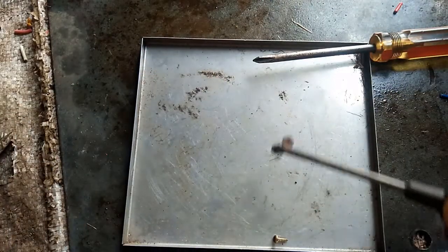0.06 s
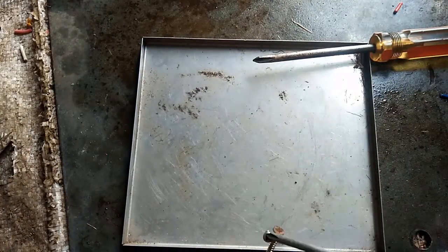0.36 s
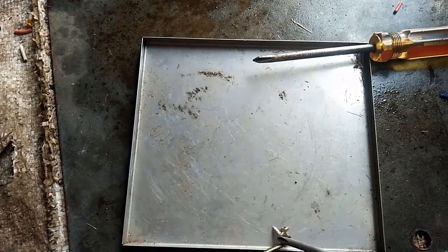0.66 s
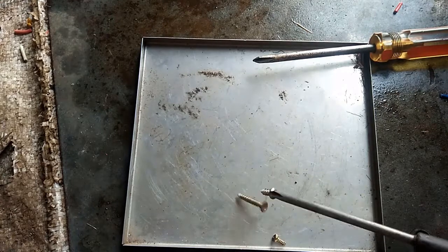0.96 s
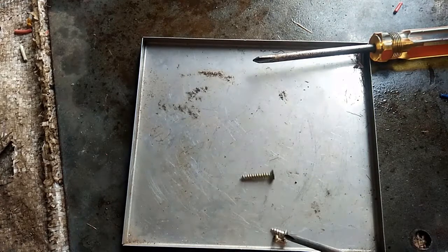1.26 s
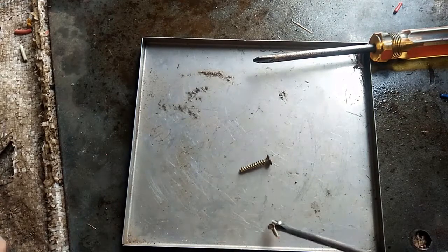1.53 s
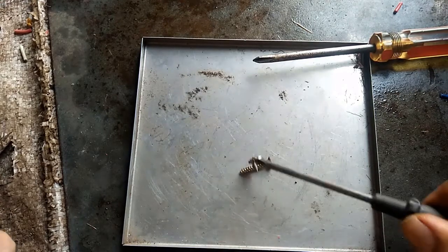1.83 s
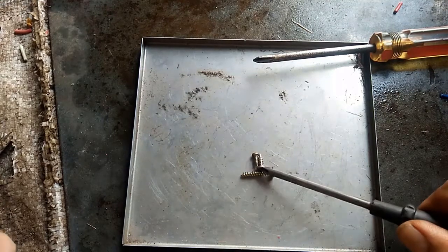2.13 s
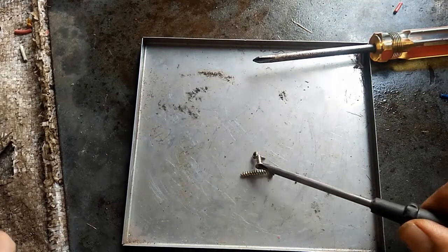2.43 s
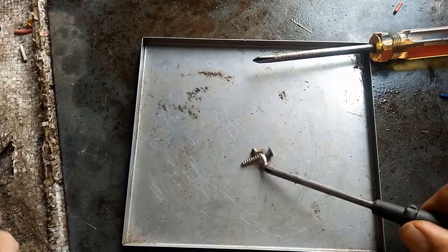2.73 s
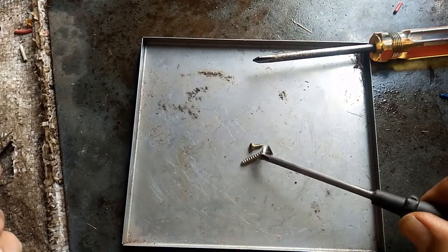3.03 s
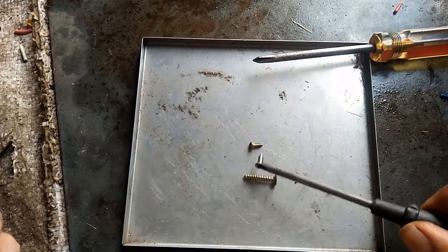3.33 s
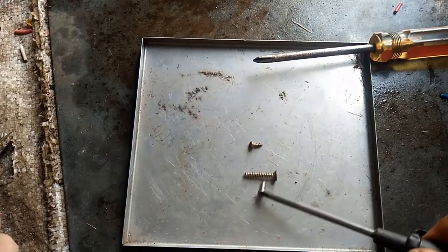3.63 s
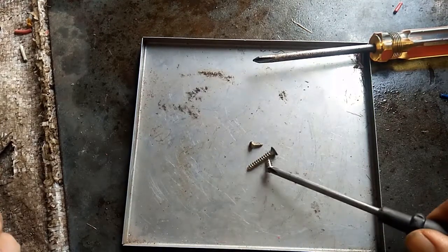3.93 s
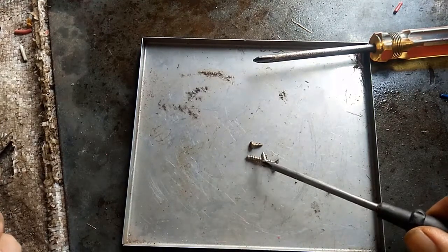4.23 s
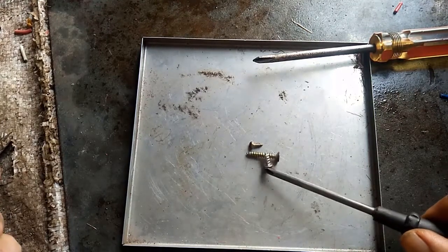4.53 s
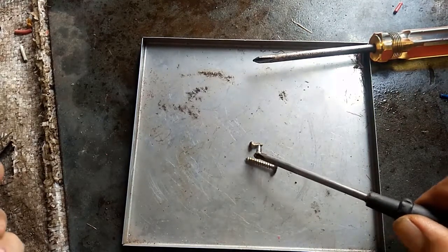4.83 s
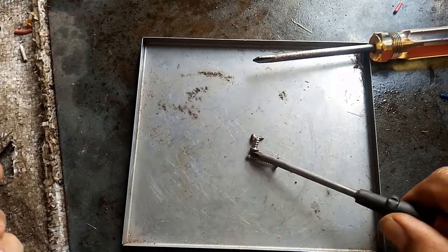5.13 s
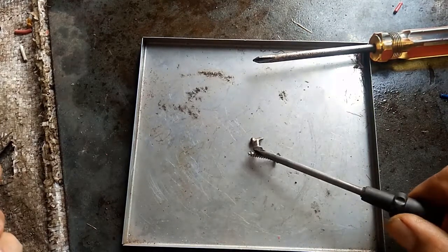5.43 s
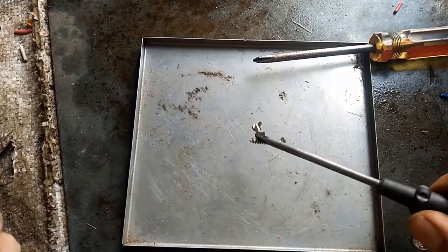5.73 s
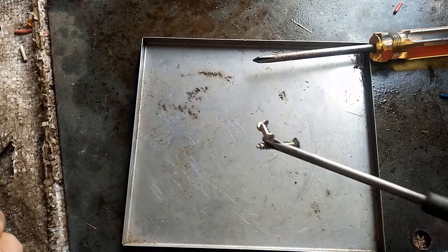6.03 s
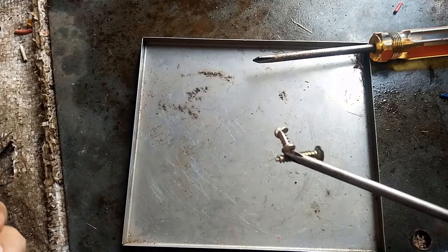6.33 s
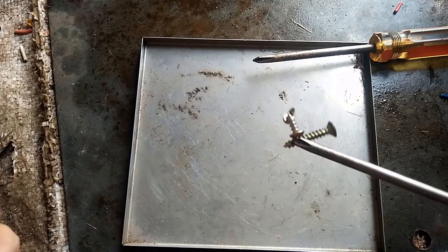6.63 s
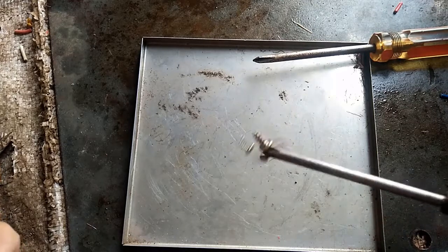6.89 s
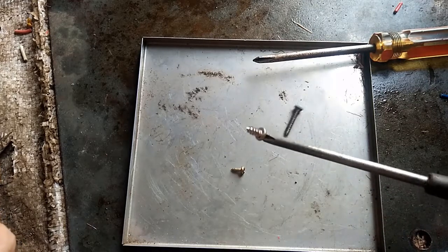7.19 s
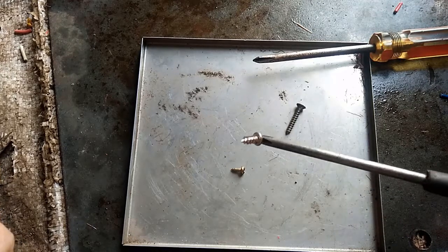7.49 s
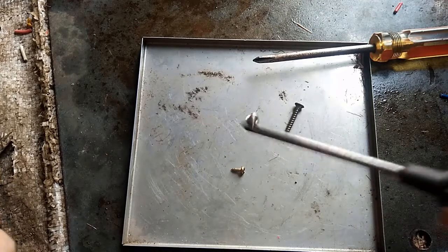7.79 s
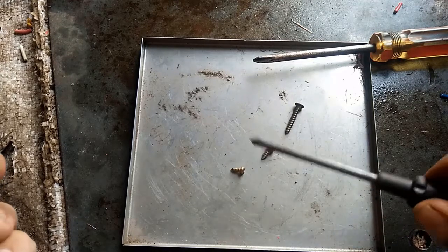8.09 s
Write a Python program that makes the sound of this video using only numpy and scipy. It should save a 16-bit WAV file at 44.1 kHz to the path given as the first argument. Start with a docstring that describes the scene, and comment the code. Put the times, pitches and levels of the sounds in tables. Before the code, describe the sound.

In a quiet room, close to a small microphone, steel screws click and chatter against each other as a magnetized screwdriver picks them up. They clatter briefly on a thin metal tray, then keep ticking in short clusters amid soft bumps of the hands and faint squeaks. After a pause, screws fall onto the tray three times, ringing and rattling, the hardest blow overloading the microphone.

```python
"""In a quiet room, close to a small microphone, a magnetised screwdriver picks up steel screws from a tray.
The screws snap onto the tip and chatter against each other. Some drop and set the sheet-metal tray
ringing, and the hardest blows overload the microphone's input. The moving hands add soft thumps and
rustle. A few thin squeaks sound over a faint hiss and hum."""
import sys
import numpy as np
from scipy import signal
from scipy.fft import rfft, irfft
from scipy.io import wavfile
from scipy.ndimage import uniform_filter1d

SR = 44100
rng = np.random.default_rng(int(sys.argv[2]) if len(sys.argv) > 2 else 0)


def inscribe(sig):
    """Save sig as 16-bit PCM at rate SR to the path in sys.argv[1].

    A 1-D sig is mono; a 2-D sig holds one channel per row.
    Samples are clipped to [-1, 1] before scaling.
    """
    pcm = np.round(np.clip(np.atleast_2d(sig).T, -1, 1) * 32767)
    wavfile.write(sys.argv[1], SR, pcm.astype(np.int16))


N = 359414

# Screws meeting the tip or each other. Each row: start in seconds, level in dB, body (below 4 kHz) in dB,
# edge (above 7 kHz) in dB, tiny bounces compared with the first tick in dB.
SCREW_CLICKS = [(0.591, -26.5, 3, -7, -1), (0.604, -12, -3, -3, 3), (0.6282, -11, -3, 1, 20),
                (0.6395, -11.5, -1, 0, 2.5), (0.6479, -6, -3, -7, -2), (0.6608, -9, -3.5, -13, 13),
                (0.6637, -8.5, -1.5, 0, 6), (0.6757, -9, -7, 0, -2), (0.6819, -12.5, -1.5, -4, 3),
                (0.7319, -12, -4, 0.5, 7), (0.8034, -31.5, 6, -0.5, 1), (0.8438, -17.5, -23, -1, 9),
                (0.8457, -29, 10.5, -3, 20), (0.8736, -32, 6.5, 0, 1), (0.9355, -28.5, -9, -6.5, -0.5),
                (1.2027, -10, 1, 2, 4), (1.407, -42, 6, 5, 5), (1.4199, -18, 1, 1.5, 9),
                (1.4453, -16, 6.5, 0.5, 24.5), (1.5593, -41.5, -3, -1, 2.5), (2.146, -24, 0.5, -7, 2.5),
                (2.152, -10, 1, -3, 3), (2.2202, -35, 6, -3, 12), (2.2364, -38.5, 1.5, -2, 8),
                (2.5115, -33, 0.5, -0.5, 8), (2.5394, -30.5, -1.5, -3.5, -3), (2.8686, -29, -10, 3, 4.5),
                (2.8766, -15.5, 8.5, 2.5, 6), (2.8834, -16, 8.5, -1.5, 26), (2.8942, -16, 11.5, 4.5, -5),
                (2.9206, -13.5, 3.5, -3.5, 6.5), (2.942, -28, 2, -1, 5.5), (3.1361, -40.5, 10, -5, -3),
                (3.1838, -42.5, 8.5, 2, 3), (3.1969, -40.5, 4, -2, 3), (3.2206, -42.5, 1, -6.5, -2),
                (3.507, -40, 6, -18, 6.5), (3.8389, -31, 5.5, -1.5, 8.5), (3.868, -22, 7, 0, 11),
                (3.884, -25.5, 7, -6, 5.5), (4.113, -47, -9, -12.5, 7), (4.2038, -43, -3, -8.5, 5.5),
                (4.2334, -37, -2, -4.5, 4), (4.3194, -9, 1.5, -1.5, 15.5), (4.6131, -19, 8, 0, 12),
                (4.6381, -30.5, -3, -8, 8), (4.7143, -42, 2.5, -9.5, -0.5), (4.826, -56, -4, -14, 4.5),
                (4.8552, -55.5, -3, -18, 5), (5.1393, -36.5, 7, 1.5, 5), (5.1589, -17.5, 3, -4, 8.5),
                (5.1937, -9.5, 1.5, 0.5, 6), (5.203, -14.5, 5.5, -1, 10), (5.482, -57, 4, 2.5, 8),
                (7.091, -34, 3, 4.5, -2.5), (7.114, -34.5, 6.5, 6.5, -1), (7.748, -50.5, -5, -16, 8),
                (7.8795, -28.5, 2, -2.5, -5.5), (7.99, -32, 0, 0.5, 2)]
# Screws hitting the tray. Each row: start in seconds, then impact, ring, body and edge, all in dB.
SCREW_DROPS = [(0.6595, -31, -31.5, 14.5, 6.5), (0.7325, -38, -38, -15.5, -1.5), (1.1591, -2, -24, 8, -2),
               (1.211, -0.5, -21, 1, 0.5), (2.8771, -20.5, -38.5, 1, -1), (4.3196, -18, -43, -1, 4.5),
               (7.157, 2, -16.5, -1, 2.5), (7.361, 9, -7, -3, 1), (8.0573, 4, -12, -1.5, 1)]
# Soft knocks of the hand. Each row: start in seconds, level in dB, pitch in Hz.
HAND_KNOCKS = [(0.237, -17.5, 82), (0.437, -16, 72), (0.625, -15.5, 57), (1.033, -24, 72.6),
               (1.105, -24, 75), (1.201, -26, 101), (1.284, -24, 82.5), (2.159, -24, 75),
               (2.268, -30.5, 103), (2.748, -23.5, 76), (2.92, -27, 107), (3.181, -23.5, 69),
               (3.308, -24.5, 65), (3.387, -17, 62.7), (3.406, -17.5, 75), (3.499, -26.5, 75),
               (3.624, -26.5, 70.8), (3.867, -20, 72), (4.298, -26.5, 70), (4.357, -26, 66),
               (5.235, -21, 104), (5.648, -30, 57.7), (7.162, -24, 110), (7.661, -24.5, 68)]
# The tone colour of the tray's many weak notes. Each row: frequency in Hz, level in dB.
SHEET_COLOUR = [(150, -13), (500, -22), (1400, -29), (2150, -17.5), (3100, -18.5), (4000, -11),
                (4400, -7.5), (5800, -0.5), (6500, -7.5), (7800, -14), (10500, -17), (13800, -28.5),
                (15500, -52)]


def screws(ring_t60=0.042, shifts=20, shift_db=-8, spread_db=2):
    """The magnet pulls the screws in. Held fast, they hardly ring, and tick faintly as the hand moves."""
    out, movement = np.zeros(N), hand_movement()
    for start, db, body_db, edge_db, scatter_db in SCREW_CLICKS:
        add(out, start, gain_of(db) * steel_tick(body_db, edge_db, scatter_db, ring_t60))
    for sample, strength in zip(rng.integers(0, N, shifts), rng.standard_normal(shifts)):
        tick = steel_tick(body_db=-2.5, edge_db=-8.5, scatter_db=0, t60=ring_t60)
        add(out, sample / SR, movement[sample] * gain_of(shift_db + spread_db * strength) * tick)
    return out


def steel_tick(body_db, edge_db, scatter_db, t60, size=4096):
    """One sharp tick, then tiny bounces and echoes off tray and bench that fade 60 dB in t60 seconds."""
    # A steel contact at the microphone, strongest near 5.6 kHz. Each row: frequency in Hz, level in dB.
    tick_colour = [(150, -30), (900, -37), (1600, -27.5), (2200, -20.5), (2700, -23), (3800, -16),
                   (4500, -9.5), (5700, 1), (6300, -5.5), (7200, -15), (9800, -19), (11500, -27),
                   (13800, -37), (15500, -60.5)]
    t = np.arange(size) / SR
    scatter = rng.choice([-1., 1.], size) * gain_of(-60 * t / t60) * (1 - np.exp(-t / 0.00061))
    blow = gain_of(scatter_db) * scatter / np.linalg.norm(scatter)
    blow[0] += 1  # the first tick
    tick = coloured(blow, tick_colour, body_db, edge_db)
    return tick / np.std(tick[:SR // 125])  # the first 8 ms set the level


def tray(weak_notes=700, rattle_db=-2.5, taps_per_s=750, rattle_t60=.28):
    """Falling screws clatter on the metal sheet, rattle to rest and leave it ringing."""
    # Weaker taps are duller. Each row: frequency in Hz, seconds to fade by an extra 60 dB.
    dulling = [(4500, 15), (6500, 8.4), (9000, 4.2), (14000, .45)]
    out = np.zeros(N)
    # A thin plate's notes are about evenly spaced in frequency.
    crowd_hz = np.linspace(150, 15500, weak_notes) + rng.uniform(-12, 12, weak_notes)
    for start, impact_db, ring_db, body_db, edge_db in SCREW_DROPS:
        add(out, start, gain_of(impact_db) * steel_tick(body_db, edge_db, scatter_db=12.5, t60=0.035))
        add(out, start, gain_of(ring_db) * tray_ring(crowd_hz, body_db, edge_db))
        taps = coloured(rattle(taps_per_s, rattle_t60), SHEET_COLOUR, body_db, edge_db)
        rim_scatter = rattle(taps_per_s=4500, t60=0.028, size=1024)
        clatter = signal.oaconvolve(faded(taps, dulling), rim_scatter)
        add(out, start, gain_of(ring_db + rattle_db) * clatter / np.std(clatter[:SR // 40]))
    return out


def tray_ring(crowd_hz, body_db, edge_db, clear_db=-1, size=32768):
    """The struck sheet rings with a few clear notes in a crowd of weak ones, different at each spot."""
    # The tray's strongest notes. Each row: frequency in Hz, level in dB, seconds to fade by 60 dB.
    clear_notes = [(1110, -24, .35), (2137, -12, .28), (2562, -19, .25), (3542, -16, .28), (4236, -7, .35),
                   (4403, -7, .31), (4659, -10, .3), (4991, -1, .31), (5209, -2, .29), (5583, -1, .27),
                   (5872, 0, .33), (6132, -3, .28), (6745, -11, .33), (6912, -11, .3), (8942, -17, .3)]
    # How long the weak notes ring. Each row: frequency in Hz, seconds to fade by 60 dB.
    sheet_fade = [(200, .5), (700, .38), (2000, .33), (5500, .31), (9000, .26), (14000, .19)]
    t, attack = np.arange(size) / SR, slice(SR // 50)
    phases = rng.uniform(0, 2 * np.pi, len(clear_notes))
    clear = sum(gain_of(db - 60 * t / t60) * np.sin(2 * np.pi * hz * t + phase)
                for (hz, db, t60), phase in zip(clear_notes, phases))
    spectrum = np.zeros(size // 2 + 1, complex)
    spectrum[(crowd_hz * size / SR).astype(int)] = rng.standard_normal((len(crowd_hz), 2)) @ [1, 1j]
    crowd = unit_level(coloured(faded(irfft(spectrum), sheet_fade), SHEET_COLOUR, body_db, edge_db))
    ring = crowd / np.std(crowd[attack]) + gain_of(clear_db) * clear / np.std(clear[attack])
    return ring / np.std(ring[attack]) * (1 - np.exp(-t / 0.0014))


def rattle(taps_per_s, t60, size=16384):
    """A dying run of tiny uneven taps, as when a screw rocks and rolls after a blow."""
    t = np.arange(size) / SR
    taps = (rng.random(size) < taps_per_s / SR) * rng.standard_normal(size) * gain_of(-60 * t / t60)
    return taps / (np.linalg.norm(taps) + 1e-12)


def hands(rustle_db=-10.0, swell_s=0.0051, rub_db=-29, bench_t60=.06):
    """Moving hands rumble and rustle. Each knock is a short, low push with a brush of noise."""
    # The tone colours of the rustle and the rumble. Each row: frequency in Hz, level in dB.
    rustle_colour = [(100, -13), (280, -3), (650, 3.5), (1000, -1), (1450, -6), (2400, -8.5), (3200, -3),
                     (4000, -9.5), (5600, 1.5), (7000, -16.5), (10000, -26.5), (15000, -46)]
    rumble_colour = [(20, -28), (45, -7), (70, -1.5), (120, -2.5), (170, -13.5), (300, -21), (600, -48.5),
                     (2000, -84.5)]
    catching_db = 2.8 * noise([(3, 0), (25, -3), (80, -14), (200, -60)])  # makes the rustle uneven
    rustle = noise(rustle_colour) * gain_of(catching_db)
    bench_scatter = rattle(taps_per_s=5300, t60=bench_t60, size=4096)
    rustle = unit_level(rustle + signal.oaconvolve(rustle, bench_scatter)[:N])
    out = hand_movement() * (noise(rumble_colour) + gain_of(rustle_db) * rustle)
    t = np.arange(SR // 8) / SR
    push = (t / swell_s) ** 2 * np.exp(2 * (1 - t / swell_s))
    for start, db, hz in HAND_KNOCKS:
        rub = gain_of(rub_db) * rustle[rng.integers(N - len(t)):][:len(t)]
        add(out, start, gain_of(db) * push * (np.sin(2 * np.pi * hz * t) + rub))
    return signal.sosfilt(signal.butter(3, 40, "highpass", fs=SR, output="sos"), out)


def hand_movement(jolt_db=-23.5, max_jolt_db=-39, knock_db=-21.5, rise_db_per_s=450, fall_db_per_s=193):
    """How strong the hand noise is over time, with a short swell around every snap, drop and knock."""
    # How busily the hands move. Each row: time in seconds, level in dB.
    motion = [(0, -55), (0.3, -46), (0.75, -39), (0.97, -47.5), (1.28, -38), (1.62, -54.5), (1.76, -51),
              (1.95, -58), (2.32, -44), (2.66, -53.5), (2.78, -46), (3.1, -52.5), (3.63, -45.5),
              (3.72, -56), (3.93, -42.5), (4.08, -57.5), (4.4, -41.5), (4.5, -65.5), (4.82, -68),
              (4.93, -57), (5.05, -76), (5.45, -62.5), (6.24, -66), (6.45, -59.5), (6.85, -67),
              (7.3, -48.5), (7.62, -39.5), (7.75, -59.5), (8.15, -65.5)]
    t = np.arange(0, N, 64) / SR
    # A harder snap jolts the hand more, up to a limit.
    jolts = [(at, min(jolt_db + 0.98 * db, max_jolt_db)) for at, db, *_ in SCREW_CLICKS + SCREW_DROPS]
    jolts += [(at, db + knock_db) for at, db, _ in HAND_KNOCKS]
    swells_db = [db - np.maximum(rise_db_per_s * (at - t), fall_db_per_s * (t - at)) for at, db in jolts]
    motion_db = np.interp(t, *np.transpose(motion))
    level = np.hypot(gain_of(motion_db), gain_of(np.max(swells_db, axis=0)))
    return np.interp(np.arange(N) / SR, t, level)


def squeaks(waver=.012, flutter_db=3):
    """Thin squeaks, unsteady in pitch and level. Most fall slightly."""
    # Each row: start in seconds, length in seconds, level in dB, first pitch in Hz, last pitch in Hz.
    glides = [(3.366, 0.063, -47, 3030, 2866), (3.377, 0.05, -51.5, 1502, 1434),
              (3.561, 0.05, -53.5, 3710, 3650), (3.602, 0.094, -58, 3660, 3590),
              (6.585, 0.11, -65.5, 3540, 3570)]
    out = np.zeros(N)
    for start, length, db, first_hz, last_hz in glides:
        n = int(length * SR)
        wobble, flutter = unit_level(uniform_filter1d(rng.standard_normal((2, SR)), 150))[:, :n]
        hz = np.linspace(first_hz, last_hz, n) * (1 + waver * wobble)
        level = gain_of(db + flutter_db * flutter) * signal.windows.tukey(n, .7)
        add(out, start, level * np.sin(2 * np.pi * np.cumsum(hz) / SR))
    return out


def after_sounds(x, tail_db=-24, after_tick_db=-13, after_tick_s=.016, sweep_s=0.018):
    """A dull, falling after-tick follows each click. Apart from it, the walls echo and the room leaves a short,
    faint tail."""
    # How long the room rings. Each row: frequency in Hz, seconds to fade by 60 dB.
    room_fade = [(200, .4), (1000, .3), (4000, .24), (12000, .14)]
    # Echoes from the walls. Each row: delay in seconds, level in dB.
    walls = [(0.0372, -28.5), (.069, -36), (.092, -36.5)]
    t = np.arange(SR) / SR
    tail = faded(rng.standard_normal(SR), room_fade) * (1 - np.exp(-t / .008))
    echoes = gain_of(tail_db) * signal.oaconvolve(x, tail / np.linalg.norm(tail))[:N]
    hz = np.linspace(4400, 1800, int(sweep_s * SR))
    sweep = np.sin(2 * np.pi * np.cumsum(hz) / SR) * signal.windows.tukey(len(hz), .5)
    after_ticks = signal.oaconvolve(x, sweep / abs(rfft(sweep)).max())
    add(echoes, after_tick_s, gain_of(after_tick_db) * after_ticks)
    for delay, db in walls:
        add(echoes, delay, gain_of(db) * x)
    return echoes


def background(hiss_db=-69.0, hum_db=-68, hum_hz=121):
    """A slightly wavering hiss and the room's faint low hum."""
    # The tone colour of the hiss. Each row: frequency in Hz, level in dB.
    hiss_colour = [(100, 5.5), (600, -5), (1000, -11.5), (2400, -18.5), (3300, -12), (3900, -18.5),
                   (5100, -12), (5550, 0), (6050, -4.5), (6700, -23), (9000, -28.5), (15000, -36)]
    waver_db = 1.8 * noise([(1, 0), (8, -3), (25, -20), (100, -70)])
    hum = np.sqrt(2) * np.sin(2 * np.pi * hum_hz * np.arange(N) / SR)
    return gain_of(hiss_db + waver_db) * noise(hiss_colour) + gain_of(hum_db) * hum


def microphone_housing(x):
    """The hollow housing of the microphone boosts some narrow bands and weakens others."""
    # The housing's peaks and dips. Each row: frequency in Hz, width in Hz, boost or cut in dB.
    bands = [(620, 110, 2), (1450, 110, 3), (2250, 130, 2), (2600, 240, -4), (2900, 100, 2), (3310, 110, 2),
             (3950, 200, -4), (4280, 130, 3), (4600, 70, 3), (4750, 140, -3), (5530, 110, 3), (6750, 90, 4),
             (7200, 80, 3), (8680, 130, 3)]
    for hz, width, db in bands:
        x = x + (gain_of(db) - 1) * signal.lfilter(*signal.iirpeak(hz, hz / width, SR), x)
    return x


def gain_of(db):
    """Turns decibels into a number to multiply by."""
    return 10 ** (np.asarray(db) / 20)


def unit_level(x):
    """Scales a sound to an average (rms) level of 1."""
    return x / np.sqrt(np.mean(x ** 2) + 1e-20)


def value_at(points, hz):
    """Looks up a table, joining its points with straight lines over log frequency."""
    points_hz, values = np.transpose(points)
    return np.interp(np.log(hz + 1), np.log(points_hz + 1), values)


def add(mix, start, sound):
    """Lays a sound into the mix at a start time in seconds."""
    part = mix[max(round(start * SR), 0):][:len(sound)]
    part += sound[:len(part)]


def coloured(x, colour, body_db, edge_db, size=2048):
    """Gives a sound a tone colour, with its lows (body) and highs (edge) turned up or down."""
    hz = np.fft.rfftfreq(size, 1 / SR)
    db = value_at(colour, hz) + value_at([(3400, body_db), (4800, 0), (6300, 0.0062), (7800, edge_db)], hz)
    # Folding the cepstrum makes the filter ring only after a blow, never before it.
    cepstrum = irfft(np.log(gain_of(db)))
    cepstrum[1:size // 2] *= 2
    cepstrum[size // 2 + 1:] = 0
    return signal.oaconvolve(x, irfft(np.exp(rfft(cepstrum))))[:len(x)]


def noise(colour):
    """Steady noise of level 1, shaped by pairs of frequency in Hz and level in dB."""
    gains = gain_of(value_at(colour, np.fft.rfftfreq(N, 1 / SR)))
    return unit_level(irfft(rfft(rng.standard_normal(N)) * gains, N))


def faded(x, fade_times, size=256):
    """Lets each frequency band of a sound die away at its own speed."""
    hz, t, bands = signal.stft(x, SR, nperseg=size)
    fade = gain_of(-60 * t / value_at(fade_times, hz)[:, None])
    return signal.istft(bands * fade, SR, nperseg=size)[1][:len(x)]


def scene():
    """Steel in the room, squeaks, and hand and background noise that ring the housing more strongly."""
    steel = screws() + tray()
    return (steel + after_sounds(steel) + squeaks() + microphone_housing(hands() + background()))[None]


def record(dry, gate_s=.07, gate_db=-58.5, gate_slope=0.62, max_cut_db=9, top_hz=15950):
    """The housing colours it all, hard blows clip, a gate turns quiet parts down, the top treble is cut."""
    clipped = np.clip(microphone_housing(dry), -1, 1)
    window = np.hanning(int(gate_s * SR))
    power = abs(signal.oaconvolve(clipped ** 2, window[None] / window.sum(), "same"))
    level_db = 10 * np.log10(power + 1e-12)
    gated = clipped * gain_of(np.clip(gate_slope * (level_db - gate_db), -max_cut_db, 0))
    low_pass = signal.firwin(255, top_hz, window=("kaiser", 8), fs=SR)
    return signal.oaconvolve(gated, low_pass[None], "same")


dry = scene()
out = record(dry)
inscribe(out)
```